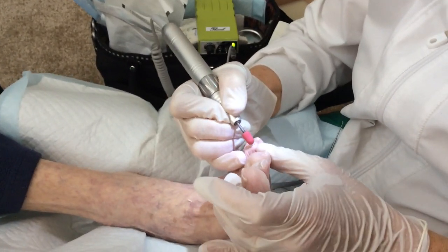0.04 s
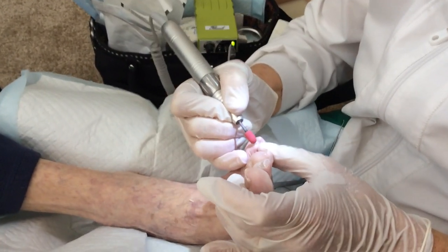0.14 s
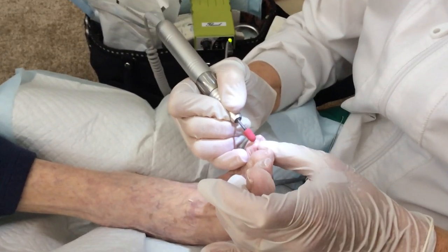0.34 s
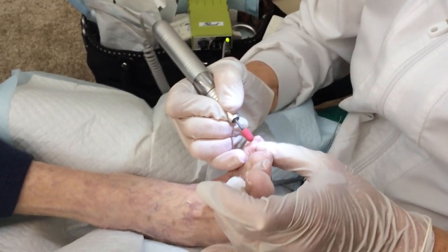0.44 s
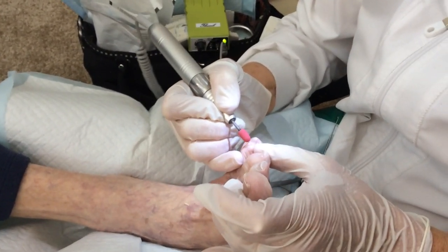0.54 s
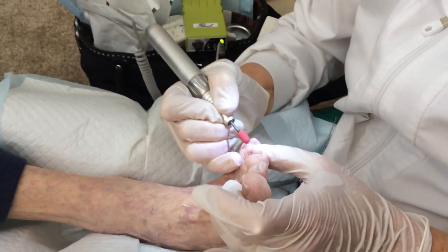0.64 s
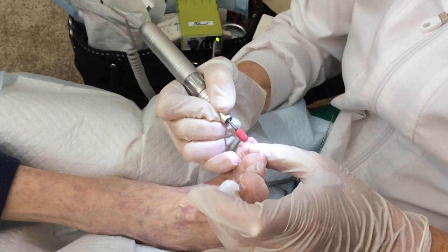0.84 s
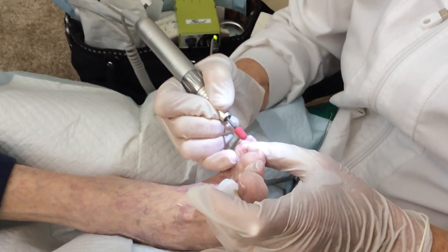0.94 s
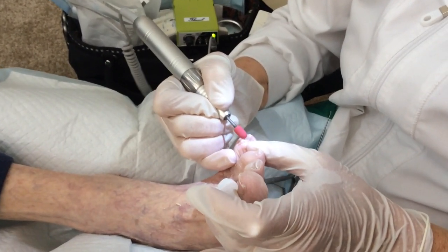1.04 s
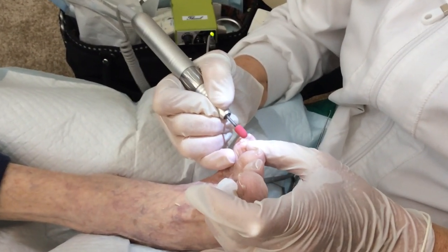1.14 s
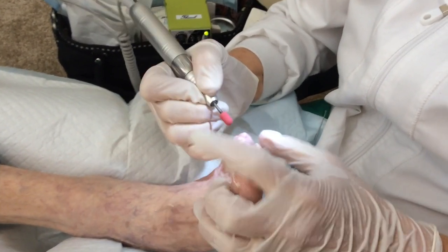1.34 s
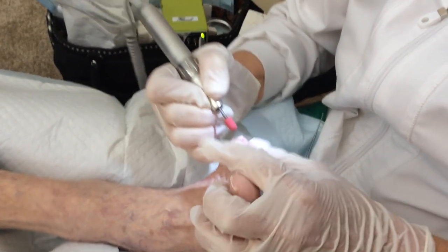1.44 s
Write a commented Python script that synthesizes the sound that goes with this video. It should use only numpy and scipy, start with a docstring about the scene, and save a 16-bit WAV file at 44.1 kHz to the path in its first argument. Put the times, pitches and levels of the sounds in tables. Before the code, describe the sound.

Five short, bright, buzzing rasps come from a powered drill touching a toenail, heard up close indoors. Its motor keeps whining and hissing between touches, sagging a little under load, and a soft glove rustle follows.

```python
"""A motor whine with bearing tones and hiss: a handheld podiatry drill runs close by in a small room.
It is pressed to a toenail five times. The bur chatters against the nail (a buzz) and drags its grit
across it (a bright rasp); the load slows the motor, so the pitch sags.
Room tone and a low hum lie underneath; at the end a gloved hand shifts with a soft rustle."""
import sys
import numpy as np
from scipy import signal
from scipy.fft import rfft, irfft
from scipy.io import wavfile
from scipy.ndimage import uniform_filter1d

SR = 44100
rng = np.random.default_rng(int(sys.argv[2]) if len(sys.argv) > 2 else 0)


def output_pcm(signal):
    """Save a mono or channel-first signal as 16-bit PCM at the path in sys.argv[1].

    Samples are clipped to [-1, 1] before scaling.
    """
    pcm = np.clip(np.atleast_2d(signal).T, -1, 1) * 32767
    wavfile.write(sys.argv[1], SR, np.round(pcm).astype(np.int16))


N = 66150
TIME = np.arange(N) / SR
IDLE_HZ = 466.7  # turns per second without load


def from_db(db):
    """Amplitude ratio of a level in decibels."""
    return 10 ** (np.asarray(db) / 20)


def rms_one(x):
    """Normalisation to unit rms."""
    return x / np.sqrt(np.mean(x ** 2) + 1e-20)


def in_time(rows):
    """Linear interpolation between (time, value) points."""
    return np.interp(TIME, *np.transpose(rows))


def at_hz(points, hz):
    """Interpolation of a spectrum on a log-frequency axis."""
    points = np.array(points)
    return np.interp(np.log(hz + 1e-9), np.log(points[:, 0]), points[:, 1])


def resonance(hz, centre_hz, width_hz):
    """Lorentzian resonance curve, 1 at its centre."""
    return 1 / (1 + (2 * (hz - centre_hz) / width_hz) ** 2)


def drift(corner_hz=14.1):
    """Slow random fluctuation: low-passed noise, rms near 1."""
    step = 40  # samples between control points
    pole = np.exp(-2 * np.pi * corner_hz * step / SR)
    white = rng.standard_normal(N // step + 2002)
    slow = signal.lfilter([1], [1, -2 * pole, pole * pole], white)[2000:]
    return np.interp(np.arange(N) / step, np.arange(len(slow)), rms_one(slow))


def noise(spectrum):
    """Spectral shaping of white noise, at unit rms."""
    hz = np.arange(N // 2 + 1) * SR / N
    return rms_one(irfft(rfft(rng.standard_normal(N)) * from_db(at_hz(spectrum, hz)), N))


def partial(phase, scatter_rad, wobble_db):
    """A sinusoid under random phase and amplitude modulation, rms near 1."""
    return np.sqrt(2) * np.cos(phase + scatter_rad * drift()) * from_db(wobble_db * drift())


# Spectrum of the room tone: (frequency [Hz], relative density [dB])
ROOM_TONE_SPECTRUM = [(25, -32), (55, -6), (90, 1.5), (140, -8.5), (360, -12.5), (600, -18), (1200, -24),
                      (3000, -29.5)]

def room_tone():
    """Stationary ambient noise, strongest in the bass."""
    return from_db(-69.5) * noise(ROOM_TONE_SPECTRUM)


# Envelope of the hum: (time [s], level [dB])
HUM_ENVELOPE = [(0, -96), (.36, -71.5), (.55, -78), (.95, -76), (1.28, -68), (1.42, -76)]

def hum(hz=90):
    """Random modulation makes a low tone waver."""
    return from_db(in_time(HUM_ENVELOPE)) * partial(2 * np.pi * hz * TIME, scatter_rad=1, wobble_db=1.5)


# Envelope of the rustle: (time [s], level [dB])
RUSTLE_ENVELOPE = [(1.26, -82), (1.32, -59.5), (1.39, -62), (1.47, -55.5), (1.5, -55)]
# Spectrum of the rustle: (frequency [Hz], relative density [dB])
RUSTLE_SPECTRUM = [(150, -9), (350, 0), (700, 3), (1100, -7), (2000, -10), (4500, -5.5), (8000, -6)]

def glove_rustle(start_s=1.26):
    """Friction of a shifting glove gives noise of uneven level."""
    level_db = in_time(RUSTLE_ENVELOPE) + 2 * drift(corner_hz=70)
    return from_db(level_db) * noise(RUSTLE_SPECTRUM) * (TIME > start_s)


def reverberation(x, t60_s=0.22):
    """Diffuse reflections in a small room arrive after 3 ms and decay exponentially."""
    t = TIME[:SR // 2]
    tail = rng.standard_normal(len(t)) * from_db(-60 * t / t60_s) * (t > .003)
    return signal.fftconvolve(x, tail / np.sqrt(np.sum(tail ** 2)))[:N]


# Spectrum of the handpiece's hiss: (frequency [Hz], relative density [dB])
HISS_SPECTRUM = [(1000, -35.5), (2000, -14.5), (4000, -17.5), (6000, -11.5), (7400, -0.5), (9500, 5.5),
                 (10800, 4), (12500, -1), (15000, 3)]

def hiss(angle):
    """Rotation modulates the amplitude of broadband noise once a turn."""
    return from_db(-49.5) * noise(HISS_SPECTRUM) * (1 + 0.16 * np.cos(angle))


# Bearing tones: (frequency at idle [Hz], relative level [dB])
BEARING_TONES = [(7714, -69), (9195, -59), (9663, -69), (10131, -64), (10282, -63), (10384, -66),
                 (10745, -66), (11612, -64), (12543, -69), (12613, -63), (12732, -69), (13550, -72),
                 (14023, -69), (14955, -68)]

def bearings(angle):
    """Bearings vibrate at inharmonic frequencies proportional to the shaft speed."""
    return sum(from_db(db + 1.5) * partial(hz / IDLE_HZ * angle, scatter_rad=0.48, wobble_db=0.5)
               for hz, db in BEARING_TONES)


# Partials of the motor: (multiple of the shaft speed [1], level [dB])
MOTOR_ORDERS = [(1, -75.5), (2, -82), (3, -85.5), (3.83, -83.5), (5, -66.5), (6, -82), (7, -74), (8, -73),
                (11, -78.5), (14, -73)]

def motor_whine(angle):
    """A rotor radiates tones at fixed multiples of its rotation frequency."""
    return sum(from_db(db) * partial(k * angle, scatter_rad=0.027, wobble_db=.6)
               for k, db in MOTOR_ORDERS)


# Nearness of the handpiece: (time [s], gain [dB])
NEARNESS = [(0, -1.5), (.4, -0.5), (.9, 0), (1.1, 1), (1.28, 1.5), (1.5, -1.5)]

def handpiece(angle):
    """Level depends on distance: bearing tones and hiss swell and fade as the handpiece is moved."""
    return motor_whine(angle) + from_db(in_time(NEARNESS)) * (bearings(angle) + hiss(angle))


# The spot of nail met at each touch: (start [s], bite gain [dB], phase spread [rad],
# upper nail resonance [Hz], its gain [dB], lower nail resonance [Hz], its gain [dB],
# rasp resonance [Hz], its gain [dB])
SPOTS = [(0.216, -1, 1.0, 5100, -9, 1500, 6, 11600, 5), (0.446, -3, 1.3, 2730, 4, 1850, -6, 12000, 2),
         (0.688, -4, 1.3, 3200, 2, 900, -2, 10050, 3), (0.9465, -6, 1.4, 2780, -6, 1850, 7, 12000, 3),
         (1.150, -9, .1, 5520, 12, 1850, 8, 10800, 2)]

def harmonic_series(angle, harmonics, spot, scatter, wobble_db):
    """Periodic contact gives harmonics of the shaft speed, with new phase offsets on each spot."""
    spread_rad = np.array(SPOTS)[spot, 2]
    wave = np.zeros(N)
    for k, db in harmonics:
        offset = spread_rad * rng.standard_normal(len(SPOTS))[spot]
        wave += from_db(db) * partial(k * angle + offset, scatter * spread_rad, wobble_db)
    return wave / np.sqrt(uniform_filter1d(wave ** 2, size=480) + 1e-12)  # steady unit rms


# Sag under load, one value a touch: (loss of shaft speed [Hz])
SAG_HZ = [.5, 11.8, 10.3, 7.2, 9.0]

def bur_speed(lag_s=0.0297):
    """Turns per second: the motor slows under load and recovers with a first-order lag."""
    sag = sum(hz * ((TIME > start) & (TIME < touch[-1][0]))
              for hz, (start, *_), touch in zip(SAG_HZ, SPOTS, TOUCHES))
    pole = np.exp(-1 / (lag_s * SR))
    return IDLE_HZ - signal.lfilter([1 - pole], [1, -pole], sag)


# Scrape as the bur first bites: (frequency [Hz], relative density [dB])
BITE_SPECTRUM = [(300, -15), (1000, -24.5), (2000, -14), (4000, -17.5), (6300, -20), (8500, -2),
                 (11000, 8.5), (13000, 2), (15500, -3)]
# Loose grains: (frequency [Hz], relative density [dB])
GRIT_SPECTRUM = [(500, -31), (1200, -32), (2500, -36.5), (5000, -18), (6500, -13.5), (8500, -18.5),
                 (10800, 0), (13000, -15), (15500, -13.5)]

def grit(angle, spot, bite_decay_s=0.025):
    """Friction noise of loose grains and a decaying first bite, bunched at the bur's high spot."""
    start, bite_db = np.array(SPOTS)[spot, :2].T
    bite = from_db(bite_db - 1.5) * np.exp(-np.abs(TIME - start) / bite_decay_s) * noise(BITE_SPECTRUM)
    grains = from_db(-11) * noise(GRIT_SPECTRUM)
    bunching = rms_one(np.exp(0.62 * np.cos(angle)))
    return (grains + bite) * bunching


# Spectral envelope of the rasp: (frequency [Hz], relative level [dB])
RASP_SPECTRUM = [(6500, -40), (7500, -12), (8500, -14), (9500, -6.5), (10500, -1.5), (11900, -4),
                 (13000, -9.5), (14500, -16.5), (15500, -15.5)]
# Narrow resonances of the bur and its shank: (frequency [Hz], width [Hz], gain [dB])
SHANK_MODES = [(10820, 210, -3.5), (12320, 69, 7.5), (11850, 20, 10.5)]

def rasp(speed, angle, spot):
    """Periodic abrasion: high harmonics sweep through the shank's resonances as the speed changes."""
    ring_hz, ring_db = np.array(SPOTS)[spot, 7:].T
    harmonics = []
    for k in range(15, 34):
        hz = k * speed
        spot_db = ring_db * resonance(hz, ring_hz, width_hz=700)
        shank_db = sum(db * resonance(hz, centre, width) for centre, width, db in SHANK_MODES)
        harmonics.append((k, at_hz(RASP_SPECTRUM, hz) + spot_db + shank_db))
    return harmonic_series(angle, harmonics, spot, scatter=.6, wobble_db=4)


# Harmonics of the nail's buzz: (multiple of the shaft speed [1], relative level [dB])
BUZZ_HARMONICS = [(1, -26), (2, -24), (3, -11), (4, -12), (5, -1), (6, -3.5), (7, -.5), (8, -1.5), (9, 0),
                  (10, -3), (11, -2), (12, -8), (13, -19), (14, -15)]

def buzz(speed, angle, spot):
    """Forced vibration: the bur chatters on the nail at shaft-speed harmonics, odd ones stronger."""
    upper_hz, upper_db, lower_hz, lower_db = np.array(SPOTS)[spot, 3:7].T
    harmonics = []
    for k, db in BUZZ_HARMONICS:
        upper = upper_db * resonance(k * speed, upper_hz, width_hz=450)
        lower = lower_db * resonance(k * speed, lower_hz, width_hz=450)
        harmonics.append((k, db + upper + lower))
    return from_db(1.5) * harmonic_series(angle, harmonics, spot, scatter=0.63, wobble_db=3.5)


# How hard the bur grinds, one list a touch: (time [s], buzz gain [dB], rasp gain [dB])
TOUCHES = [
    [(0.22, -67, -38), (0.23, -50.5, -38), (0.242, -59, -42), (0.262, -112, -49), (0.288, -56, -43.5),
     (0.306, -52, -45), (0.325, -95, -66)],
    [(0.45, -48, -38), (0.49, -46.5, -36.5), (0.564, -47.5, -39.5), (0.58, -48.5, -34.5),
     (0.606, -102, -86), (0.615, -78, -68)],
    [(0.69, -44.5, -32), (0.71, -43.5, -39), (0.812, -41, -33), (0.85, -71.5, -58), (0.858, -95, -71),
     (0.865, -82, -70)],
    [(0.95, -49, -31.5), (0.958, -40.5, -32.5), (0.974, -41.5, -35.5), (0.992, -45, -35.5),
     (1.012, -54, -35.5), (1.026, -55, -47), (1.065, -92, -68)],
    [(1.15, -67, -44), (1.158, -52, -37), (1.166, -57.5, -26.5), (1.192, -47.5, -44.5),
     (1.208, -57.5, -35.5), (1.242, -68, -53), (1.26, -82, -54)],
]

def grinding(speed, angle, attack_s=.0007):
    """Contact force sets the amplitude: each touch starts abruptly, then follows the hand."""
    starts = [row[0] for row in SPOTS]
    spot = np.maximum(np.searchsorted(starts, TIME) - 1, 0)  # row of SPOTS at each sample
    buzz_gain, rasp_gain = np.zeros((2, N))
    for start, touch in zip(starts, TOUCHES):
        times, buzz_db, rasp_db = np.transpose(touch)
        contact = np.clip((TIME - start) / attack_s, 0, 1) * (TIME <= times[-1])
        buzz_gain += contact * from_db(np.interp(TIME, times, buzz_db))
        rasp_gain += contact * from_db(np.interp(TIME, times, rasp_db))
    chatter = buzz(speed, angle, spot)
    abrasion = rasp(speed, angle, spot) + grit(angle, spot)
    return buzz_gain * chatter + rasp_gain * abrasion


def scene():
    """Superposition of all sources, alike in both channels; one shaft angle drives the whole drill."""
    speed = bur_speed()
    angle = 2 * np.pi * np.cumsum(speed) / SR
    nail = grinding(speed, angle)
    drill = nail + from_db(-13) * reverberation(nail) + handpiece(angle)
    mono = drill + hum() + glove_rustle() + room_tone()
    return np.array([mono, mono])


def record(dry, cutoff_hz=15200):
    """An elliptic low-pass filter cuts the highest treble steeply."""
    return signal.sosfilt(signal.ellip(12, .1, 80, cutoff_hz, fs=SR, output="sos"), dry)


dry = scene()
out = record(dry)
output_pcm(out)
```